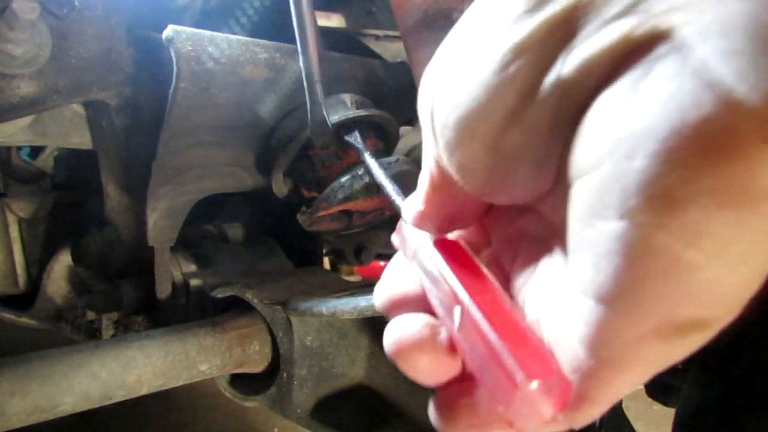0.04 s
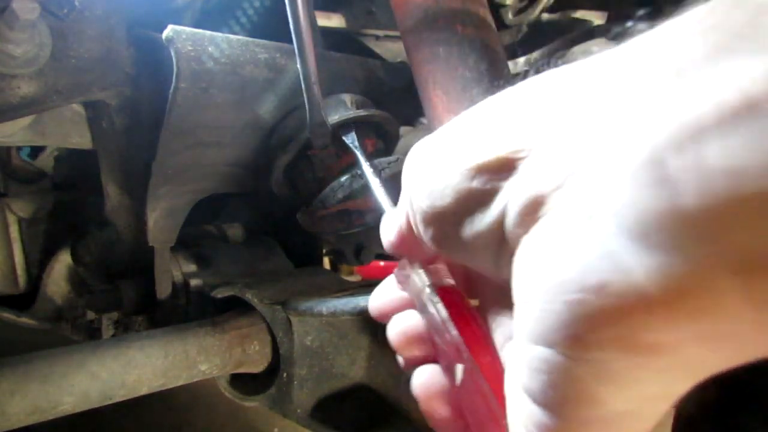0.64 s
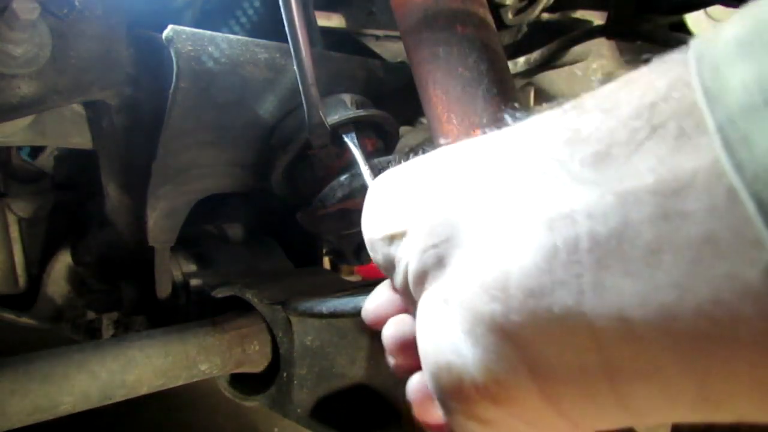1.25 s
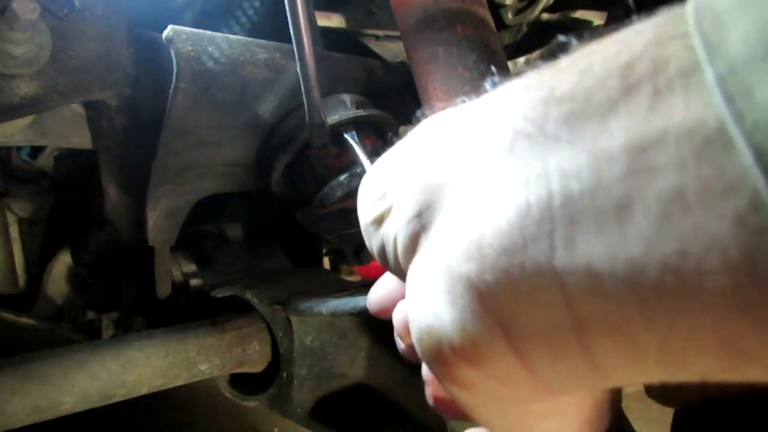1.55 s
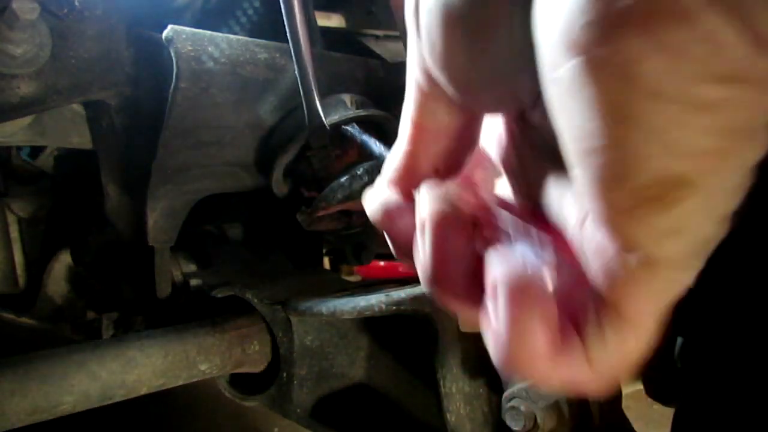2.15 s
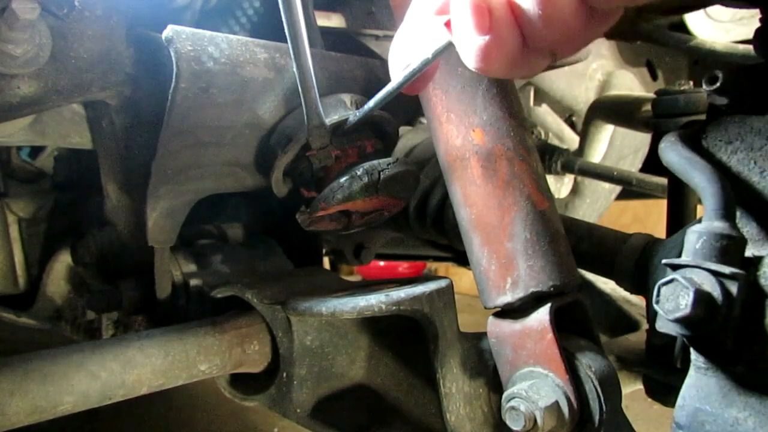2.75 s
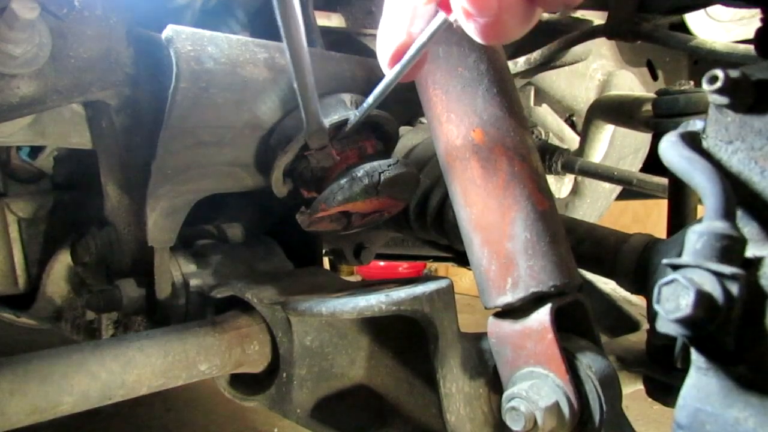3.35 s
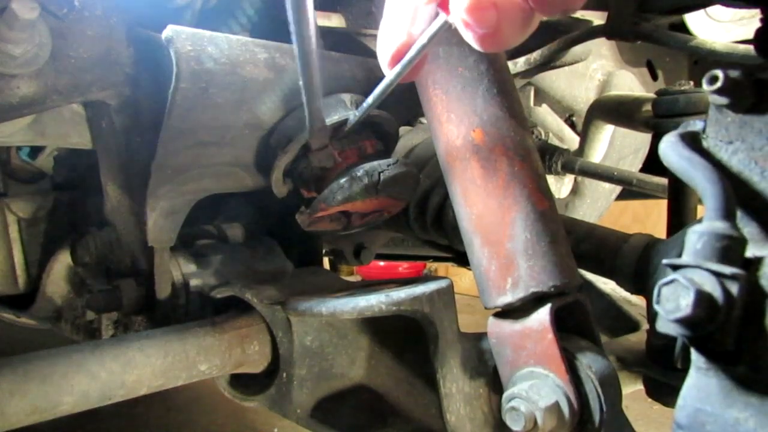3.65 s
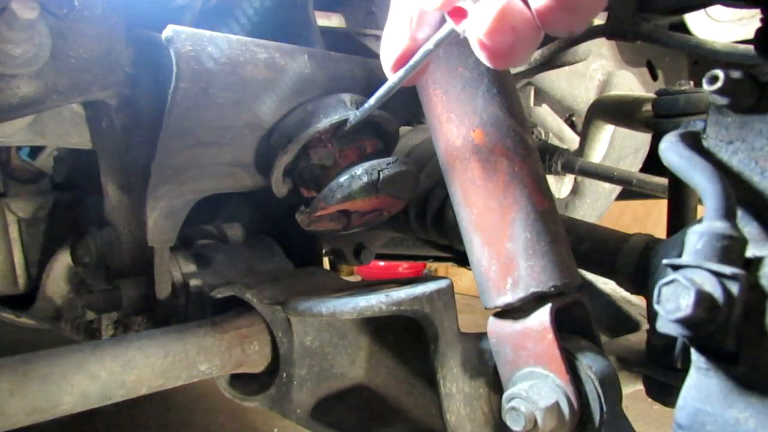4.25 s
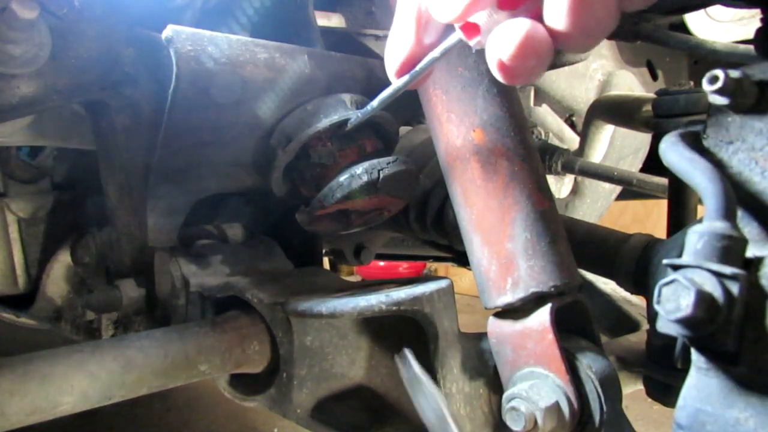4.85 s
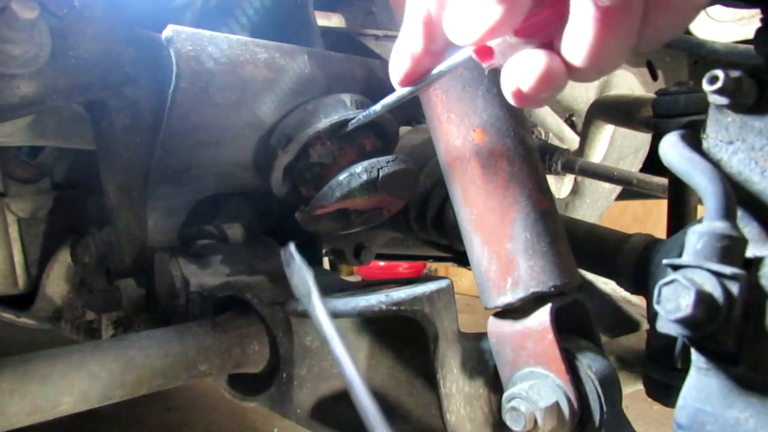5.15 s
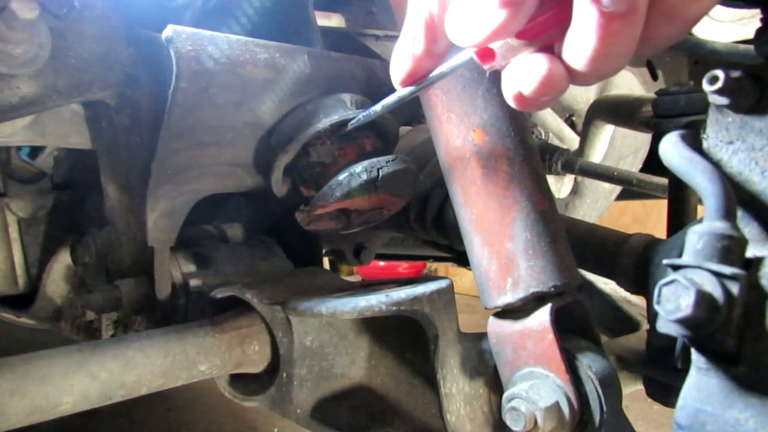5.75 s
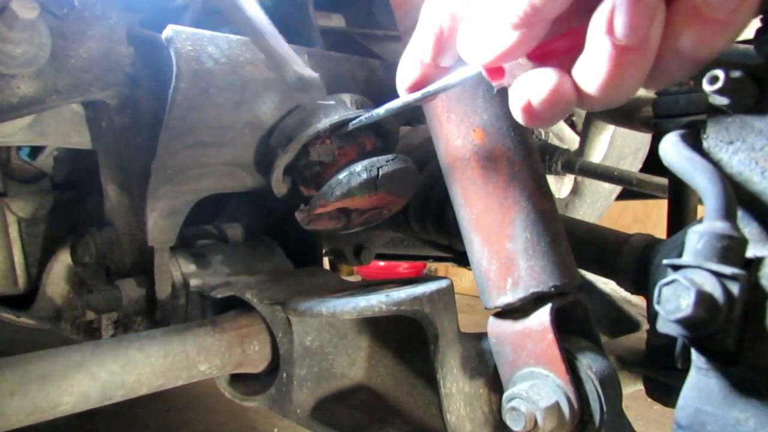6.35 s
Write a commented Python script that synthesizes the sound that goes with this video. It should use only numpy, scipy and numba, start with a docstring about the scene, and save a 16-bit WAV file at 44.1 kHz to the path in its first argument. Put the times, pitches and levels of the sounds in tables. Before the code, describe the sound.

Two screwdrivers pry old rubber out of a car's suspension mount, heard close in a quiet garage. A sharp, briefly ringing metal snap opens, followed by a short skid and a second snap. Soft scraping and rust ticks continue, and a sleeve brushes past with thin handle squeaks. The rubber groans faintly before a loud double snap. Light tip clicks and more rubbing lead to one last metallic clack.

```python
"""Sharp metal snaps and soft rubbing, close by in a quiet garage: two screwdrivers pry a perished
rubber bush (a sleeve of rubber) out of a car's suspension mount. The blades rub through the rubber,
slip, and hit the steel bracket, cup washer and arm, which ring briefly. Rust ticks, the rubber groans
and thuds, a handle squeaks and a shirt sleeve brushes by. An automatic gain control turns the sound
down for a moment after the loudest snaps."""
import sys
import numpy as np
from scipy import signal
from scipy.fft import rfft, irfft
from scipy.io import wavfile
from scipy.ndimage import uniform_filter1d
from numba import njit

SR = 44100
rng = np.random.default_rng(int(sys.argv[2]) if len(sys.argv) > 2 else 0)


def wav_out(sig):
    """Save sig, one row per channel (or a flat mono array), as 16-bit PCM at SR to the path in sys.argv[1]."""
    wavfile.write(sys.argv[1], SR, np.round(np.clip(np.atleast_2d(sig).T, -1, 1) * 32767).astype(np.int16))


N = 290619
TIME = np.arange(N) / SR
AFTER = TIME[:SR // 2]  # seconds since a hit

# A fade time (t60) is how long a sound takes to drop 60 dB. Pan is left level minus right level.
# Hits on each steel part. Each row: start in seconds, level in dB, brightness in dB per octave,
# fade time of the crack in seconds, level of the ringing and its wash in dB, pan in dB.
BRACKET_HITS = [(0.2712, -7, 2.2, 0.032, -5, 0), (0.9328, -11, -0.4, 0.038, 3, 5)]
CUP_HITS = [(4.4471, -6, 1.5, 0.028, -5.5, -6), (4.5418, -14, -1, 0.037, -5, -6.5),
            (5.7041, -33.5, -7, 0.018, -5, -8)]
ARM_HITS = [(5.7425, -42, -7.5, 0.033, 1, 3), (5.7630, -41, -7, 0.013, 6.5, -4),
            (6.2264, -15.5, -0.2, 0.05, -2, -2.5), (6.3680, -37, -5, 0.037, 12.5, -1)]
SHANK_HITS = [(3.7698, -32.5, 0, .014, -1, 0), (3.7812, -34.5, 0, 0.011, -1, 0.0049)]  # one screwdriver's shaft taps the other
# The tones each part rings with. Each row: pitch in Hz, relative level in dB, fade time in seconds.
BRACKET_TONES = [(380, -29, .2), (506, -33, .22), (1450, -12, .08), (1535, -5, .11), (1620, -11, .13),
                 (1712, -14, .17), (1784, -14, .19), (2614, -14, .1), (2905, -11, .14), (3322, -3, .08),
                 (3586, -9, .09), (3725, -10, .07), (4132, 1, .04), (4606, -13, .13), (4800, -10, .1),
                 (6240, -5, .05), (8850, -13, .05)]
CUP_TONES = [(350, -27, .15), (1480, -10, .05), (1590, -13, .1), (2207, -16, .08), (2905, 1, .04),
             (2925, -14, .16), (3650, -16, .1), (4317, -8, .06), (4608, -13, .12), (4915, -3, .065),
             (6331, -18, .06), (11390, -17, .05)]
ARM_TONES = [(1035, -2, 0.059), (1155, 7.5, 0.061), (1440, -3, 0.062), (2090, -6, 0.06), (2760, -15, 0.041),
             (3440, -12, .05)]
SHANK_TONES = [(1280, -2, 0.033), (1425, 2.5, 0.027), (4750, 1, 0.044), (6400, -4, .07)]
SKID_TONES = [(509.4, 4, 0.28), (526, -2, .22), (499, -2.5, 0.36), (1730, 0, 0.29)]  # the bracket after a skid
# A blade skids, catches and skids on. Each row: start in seconds, length in seconds, level in dB.
BLADE_SKIDS = [(0.388, 0.0062, -27), (0.406, 0.021, -22.5)]
# The second blade touches the lower washer. Each row: start in seconds, level in dB.
TIP_TOUCHES = [(5.2926, -36), (5.3273, -24), (5.3686, -34), (5.3918, -28)]
# The clearest rust cracks. Each row: start in seconds, level in dB, brightness in dB per octave,
# fade time in seconds.
RUST_TICKS = [(.659, -37, 7, .008), (.8345, -37, 5, .008), (1.366, -29.5, -3.5, 0.0093),
              (2.314, -29, 1.5, 0.15), (2.380, -30.5, 13, .027), (2.672, -33, -3, 0.0064),
              (2.684, -36.5, 14, .045), (2.7458, -41.5, -3, 0.04), (2.816, -43.5, -8.5, 0.022),
              (2.903, -36.5, -1, 0.011), (2.9087, -35.5, -4.5, 0.017), (2.93, -40, -3, 0.024),
              (2.9574, -35, -3.5, .014), (2.9883, -36.5, -1.5, 0.015), (3.09, -46, -13.5, 0.018),
              (3.1, -41.5, -2, .02), (3.781, -43, -8, .043), (4.1775, -39, 2.5, 0.068)]
# Where the scraping tip is. Each row: time in seconds, pan in dB.
TIP_PAN = [(.66, 2), (1.37, -3), (2.5, 0), (3.8, 0), (5.3, -5), (6.3, 0)]
# Rubbing strokes. Each row: start in seconds, length in seconds, relative level in dB,
# swell in dB per second, fine grit in dB, low drag in dB, pan in dB.
RUBBER_STROKES = [(-.06, 0.24, -55, -45, 1, -9, -2.5), (.48, .2, -54.5, -18, 0, -3, -3),
                  (.665, 0.21, -50, 48, -3.5, -12.5, -4.5), (.95, 0.15, -51, -38, -3.5, -6, -3),
                  (1.115, 0.14, -41.5, -17, -6.5, -13, -4.5), (2.53, 0.3, -56.5, -39, 0, -8.5, -4),
                  (2.96, 0.13, -60, 4, 0.5, 2.5, 0.5), (3.12, .27, -52.5, -6, 3.5, -5.5, 1),
                  (3.41, 0.18, -58, -8, -2.5, -12, 2), (3.73, 0.18, -54, 6, -2.5, -6.5, 1),
                  (3.95, 0.26, -64.5, 33, -3, 3, -3), (4.85, 0.31, -54.5, -5, -3.5, -1, -4),
                  (5.055, 0.051, -65.5, -5, 16.5, -23, -2), (5.305, 0.053, -55.5, 22, 9.5, -3, -6),
                  (5.38, 0.12, -52, 8, -2.5, 3.5, -4.5), (5.53, 0.18, -56, -12, -4, 1.5, -3.5),
                  (6.23, 0.09, -52, 0, -6, -3, 0), (6.32, 0.11, -50, -35, 1, -2, 1.5),
                  (6.48, .13, -51.5, 12, -4, -5, 1.5)]  # a blade in the rubber
RIM_STROKES = [(4.18, .26, -58, 28, -8, -2, -1.5), (4.54, 0.11, -52, 2, -17, -6.5, -3),
               (4.66, 0.16, -60, -19, -26, -1, -4), (4.96, 0.25, -58.5, -8, -5, -5, -8)]  # a blade on the cup washer's rim
SLEEVE_STROKES = [(1.89, 0.487, -51.5, 6.6, 0.66, -4.5, -1.9), (2.205, 0.081, -45.5, 5.5, 7, -24, -.5)]  # cloth brushing by
# Bumps as the rubber gives. Each row: start in seconds, level in dB, upper edge of the sound in Hz,
# fade time in seconds, pan in dB.
RUBBER_THUDS = [(1.2561, -40, 1140, 0.094, -2), (2.7800, -52, 130, .13, -1), (3.601, -57, 400, 0.2, 5),
                (4.4473, -26.5, 440, 0.021, -16), (6.354, -36.5, 805, 0.064, 0)]
# The handle turns in the palm. Each row: start in seconds, length in seconds, pitch in Hz, level in dB.
HANDLE_SQUEAKS = [(1.924, 0.19, 3930, -56.5), (2.09, .12, 2630, -51.5), (2.233, 0.052, 3870, -43)]

# Colours: how strong each noise is from bass to treble. Each row: frequency in Hz, relative level in dB.
BRACKET_CRACK_COLOUR = [(200, -38), (950, -31), (1540, -10), (2300, -22), (3300, -1), (4150, 0),
                        (5400, -16), (6300, -7), (7600, -17), (9000, -12), (12000, -21), (16000, -28)]
BRACKET_WASH_COLOUR = [(150, -26), (420, -9), (950, -17.5), (1600, 5), (2250, -11.5), (3000, 0), (4800, -5),
                       (5400, -13.5), (9000, -20), (16000, -36)]
CUP_CRACK_COLOUR = [(200, -40.5), (700, -34.5), (1500, -3), (2450, -11), (2920, 6.5), (3500, -1.5),
                    (4700, 2.5), (5800, -11.5), (8500, -13), (12000, -25.5), (16000, -22)]
CUP_WASH_COLOUR = [(150, -48), (340, 0), (600, -16), (1100, -14), (1550, -1), (2500, -5), (3000, -9),
                   (3700, -4), (4900, 4), (5800, -8), (9000, -15), (16000, -38)]
ARM_CRACK_COLOUR = [(100, -36), (500, -20.5), (950, -6.5), (1600, -8.5), (2100, -2), (3100, -2),
                    (5000, -6.5), (9000, -12.5), (16000, -23)]
ARM_WASH_COLOUR = [(100, -14), (500, -4.5), (1100, 1.5), (3000, -2), (6000, -10), (16000, -23)]
CLICK_COLOUR = [(300, -59), (2000, -20), (4000, 7.5), (9000, 5), (12500, 2), (16000, -27)]  # a hardened tip
CHATTER_COLOUR = [(200, -33), (1000, -27), (1550, -9), (2100, -13), (3000, -1), (3700, 1), (4400, -2),
                  (5300, -18), (6400, -5), (7500, -18), (9000, -16), (16000, -28)]
LIGHT_TOUCH_COLOUR = [(1000, -11), (4500, -19), (6000, -5), (7800, 8), (10000, -3), (16000, -10)]
TICK_COLOUR = [(200, -32), (1400, -4), (4500, 4.5), (9000, 1), (16000, -7)]
RUBBER_COLOUR = [(700, -26), (1500, -7), (2200, 0), (3200, 0.5), (4700, -0.5), (6500, -5.5), (9000, -21),
                 (16000, -66)]
WASHER_RIM_COLOUR = [(700, -20), (1250, -10), (1520, 5), (1850, 0), (2600, 1), (2900, 1), (3300, -4),
                     (4200, 0.5), (4900, 1), (5800, -5), (9000, -20), (16000, -35)]
SLEEVE_COLOUR = [(700, -25), (1400, -1.5), (2500, 1), (4000, 3.5), (6500, -2.5), (9000, -9), (16000, -33)]
FINE_GRIT_COLOUR = [(3500, -12.5), (7000, 1.5), (9000, -1.5), (13000, -4), (16000, -7)]
LOW_DRAG_COLOUR = [(120, -22), (220, -6.5), (410, -3), (510, -1.5), (640, -1.5), (830, 1), (1100, -4),
                   (1380, 0), (1530, -5), (1700, -3), (3000, -37)]
GROAN_COLOUR = [(100, -33), (180, -12), (212, 0), (265, -5.5), (340, -2), (440, -9.5), (800, -14.5),
                (2000, -45)]
AIR_COLOUR = [(15, -61), (25, -2.5), (114, -6.5), (256, -10), (317, -8.5), (394, -7), (439, -10), (476, -7),
              (607, -9.5), (1130, -8.5), (1700, -11), (2690, -12), (3620, -12.5), (10100, -17.5),
              (16000, -23)]


def snaps(hits, tones, crack_colour, wash_colour, tones_db, wash_db, wash_t60, tip_db, tip_t60=0.0019):
    """A blade hits steel: a click, a crack, ringing, then a wash of noise from the wheel well's panels."""
    out = np.zeros((2, N))
    for start, db, tilt_db, t60, ring_db, pan_db in hits:
        tip = colour(burst(tip_t60, alike=0.41), CLICK_COLOUR, tilt_db)
        crack = colour(burst(t60, alike=0.42), crack_colour, tilt_db)
        wash = colour(burst(wash_t60, alike=0.26), wash_colour, tilt_db / 2)
        ringing = undb(ring_db + tones_db) * steel_ring(tones)
        direct = place(undb(tip_db) * tip + crack + ringing, pan_db)
        add(out, start, undb(db) * (direct + undb(ring_db + wash_db) * wash))
    return out


def steel_ring(tones, spread=1.0, rise_s=0.00037):
    """Struck steel vibrates in fading tones, each a little out of step between left and right."""
    out = 0
    for hz, db, t60 in tones:
        phase = rng.uniform(0, 2 * np.pi) + spread * np.array([[0], [rng.standard_normal()]])
        detuned = hz * (1 + 0.0029 * rng.standard_normal())  # the blade's pressure shifts the pitch
        out = out + undb(db) * fade(t60) * np.sin(2 * np.pi * detuned * AFTER + phase)
    return out * (1 - np.exp(-AFTER / rise_s))


def skid(slip_hz=600, attack_s=0.0084, release_s=0.017, wash_db=-11, ring_db=-40):
    """A blade sticks and slips unevenly across the bracket, chattering and leaving it humming."""
    gap_chance, size_chance = rng.standard_normal((400, 2)).T
    times = BLADE_SKIDS[0][0] + np.cumsum(np.exp(0.5 * gap_chance)) / slip_hz
    force = sum(undb(db) * contact(times - start, length, attack_s, release_s)
                for start, length, db in BLADE_SKIDS)
    slips = np.zeros(N)
    slips[(times * SR).astype(int) % N] = force * undb(2 * size_chance) * np.sqrt(SR / slip_hz)
    crack = colour(burst(0.022, alike=0.34), CHATTER_COLOUR)
    wash = colour(burst(0.2, alike=0.57), BRACKET_WASH_COLOUR)
    one_slip = np.sqrt(2) * (crack / np.linalg.norm(crack) + undb(wash_db) * wash / np.linalg.norm(wash))
    out = signal.fftconvolve(slips[None], one_slip, axes=1)[:, :N]
    add(out, BLADE_SKIDS[-1][0], undb(ring_db) * steel_ring(SKID_TONES, spread=0.59, rise_s=0.018))
    return out


def tip_touches(t60=0.0085, pan_db=-5.5):
    """A light touch rings only the very tip of a blade, thin and bright."""
    out = np.zeros((2, N))
    for start, db in TIP_TOUCHES:
        click = colour(burst(t60, alike=0.26), LIGHT_TOUCH_COLOUR)
        add(out, start, undb(db) * place(click, pan_db))
    return out


def rust_ticks(flake_count=14, flake_db=-45, flake_tilt_db=1.5, flake_t60=0.009, tail_db=-24):
    """Brittle rust breaks in tiny cracks: clear ones, plus faint flakes at random during the rubbing."""
    out, flakes = np.zeros((2, N)), []
    for _ in range(flake_count):
        start, length = RUBBER_STROKES[rng.integers(len(RUBBER_STROKES))][:2]
        moment = start + length * rng.random()
        flakes.append((moment, flake_db + 4 * rng.standard_normal(), flake_tilt_db, flake_t60))
    for start, db, tilt_db, t60 in RUST_TICKS + flakes:
        pan_db = np.interp(start, *np.transpose(TIP_PAN))
        crack = noise(len(AFTER), alike=0.42) * (fade(t60) + undb(tail_db) * fade(t60=0.38))
        add(out, start, undb(db) * sides(pan_db) * colour(crack, TICK_COLOUR, tilt_db))
    return out


def rubbing(strokes, body_colour, scatter_db, gain_db, attack_s, release_s):
    """Tiny slips make a rasp with grit above and drag below; each stroke swells or eases steadily."""
    body = colour(tiny_slips(700, scatter_db, alike=0.17), body_colour)
    grit = colour(tiny_slips(1500, scatter_db, alike=0.016), FINE_GRIT_COLOUR)
    drag = colour(tiny_slips(150, scatter_db, alike=0.059), LOW_DRAG_COLOUR)
    out = np.zeros((2, N))
    for start, length, db, swell_db_per_s, grit_db, drag_db, pan_db in strokes:
        span = (TIME > start) & (TIME < start + length + release_s)
        t = TIME[span] - start
        level_db = db + gain_db + swell_db_per_s * (t - length / 2)
        pressure = contact(t, length, attack_s, release_s) * undb(level_db)
        rasp = body[:, span] + undb(grit_db) * grit[:, span] + undb(drag_db) * drag[:, span]
        out[:, span] += pressure * sides(pan_db) * rasp
    return out


def thuds():
    """The rubber lets go and the lever bumps softly against the mount."""
    out = np.zeros((2, N))
    for start, db, edge_hz, t60, pan_db in RUBBER_THUDS:
        dull_colour = [(30, -2), (edge_hz / 3, 0), (edge_hz, -4), (edge_hz * 6, -45)]
        bump = colour(burst(t60, alike=0.49), dull_colour)
        add(out, start, undb(db) * sides(pan_db) * bump)
    return out


def handle_squeaks(width_hz=570, attack_s=0.033, release_s=0.039):
    """Tiny slips of the handle in the palm gather around one pitch and make a thin squeak."""
    out, slips = 0, tiny_slips(300, scatter_db=1.2, alike=0.39)
    for start, length, hz, db in HANDLE_SQUEAKS:
        b, a = signal.iirpeak(hz, hz / width_hz, fs=SR)
        tone = signal.lfilter(b, a, signal.lfilter(b, a, slips))  # filtering twice narrows it further
        out = out + undb(db) * tone / np.std(tone) * contact(TIME - start, length, attack_s, release_s)
    return out


def rubber_groan(start_s=3.74, gives_s=4.46, peak_db=-52.5, build_db_per_s=12.5, relax_db_per_s=36):
    """Stretched rubber creeps in slow, dull slips, louder as the load builds and fading once it gives."""
    since = TIME - gives_s
    load_db = peak_db + np.minimum(build_db_per_s * since, -relax_db_per_s * since)
    grip = np.clip((TIME - start_s) / 0.066, 0, 1)
    creep = colour(tiny_slips(90, scatter_db=1.5, alike=0.41), GROAN_COLOUR)
    return grip * undb(load_db) * creep * sides(pan_db=-3.9)


def garage(air_db=-52.5, hum_hz=115, hum_db=-76):
    """Still air and a faint mains hum, both wavering slightly in level."""
    air = colour(noise(N, alike=0.019), AIR_COLOUR) * undb(air_db + 0.5 * wander(4.2))
    hum = undb(hum_db + 2 * wander(3.22)) * np.sin(2 * np.pi * hum_hz * TIME)
    return (air + hum) * sides(pan_db=-1.35)


def undb(db):
    """Turn decibels into a number to multiply by."""
    return 10 ** (np.asarray(db) / 20)


def fade(t60):
    """A curve that drops 60 dB every t60 seconds."""
    return np.exp(-np.log(1000) * AFTER / t60)


def contact(t, length, attack_s, release_s):
    """Rise smoothly, hold until the length is over, then let go smoothly."""
    rise = np.clip(t / attack_s, 0, 1)
    fall = np.clip(1 - (t - length) / release_s, 0, 1)
    return np.sin(np.pi / 2 * rise) ** 2 * np.sin(np.pi / 2 * fall) ** 2


def noise(count, alike):
    """Stereo hiss; alike is the share (0 to 1) that left and right have in common."""
    return np.sqrt(alike) * rng.standard_normal(count) + np.sqrt(1 - alike) * rng.standard_normal((2, count))


def burst(t60, alike):
    """Hiss that starts suddenly and dies away."""
    return noise(len(AFTER), alike) * fade(t60)


def wander(rate_hz):
    """A curve that glides to a new random value rate_hz times a second."""
    hold = int(SR / rate_hz)
    steps = np.repeat(rng.standard_normal(N // hold + 1), hold)
    return 1.8 * uniform_filter1d(steps, hold)[:N]


def tiny_slips(rate_hz, scatter_db, alike):
    """Friction is many slips of unequal size: hiss whose level flickers."""
    slips = noise(N, alike) * undb(scatter_db * wander(rate_hz) + 0.59 * wander(35))
    return slips / np.std(slips)


def colour(sound, points, tilt_db=0, size=2048):
    """Filter a sound to a colour, brighter by tilt_db per octave; plain hiss keeps its power."""
    hz, db = np.transpose(points)
    octave = np.log2(np.maximum(np.fft.rfftfreq(size, 1 / SR), 1))
    tilt = tilt_db * np.clip(octave, np.log2(hz[0]), np.log2(hz[-1]))
    gain = undb(np.interp(octave, np.log2(hz), db) + tilt)
    cepstrum = irfft(np.log(gain / np.sqrt(np.mean(gain ** 2))))
    # folding the second half onto the first keeps the filter from sounding before a hit
    cepstrum[1:size // 2] *= 2
    cepstrum[size // 2 + 1:] = 0
    response = irfft(np.exp(rfft(cepstrum)))
    return signal.fftconvolve(sound, response[None], axes=1)[:, :sound.shape[1]]


def sides(pan_db):
    """Left and right gains for a pan."""
    return undb(np.array([pan_db, -pan_db]) / 2).reshape(2, -1)


def place(sound, pan_db):
    """A sound from one side reaches the other side weaker, and 30 microseconds later for each dB."""
    lags = np.maximum([-pan_db, pan_db], 0) * 3e-5
    delayed = [np.interp(AFTER - lag, AFTER, channel, left=0) for lag, channel in zip(lags, sound)]
    return sides(pan_db) * np.array(delayed)


def add(track, start_s, sound):
    """Mix a sound into a track at a given time."""
    start = min(max(int(start_s * SR), 0), N)
    track[:, start:start + sound.shape[1]] += sound[:, :N - start]


@njit
def follow(size, attack, release):
    """Track a sound's level, rising at the attack rate and falling at the release rate."""
    out, level = np.empty(len(size)), 0.
    for i in range(len(size)):
        level += (size[i] - level) * (attack if size[i] > level else release)
        out[i] = level
    return out


def scene():
    """Snaps, scraping and rubbing over the quiet of the garage."""
    steel = snaps(BRACKET_HITS, BRACKET_TONES, BRACKET_CRACK_COLOUR, BRACKET_WASH_COLOUR,
                  tones_db=-8, wash_db=-15, wash_t60=0.25, tip_db=-15)
    steel += snaps(CUP_HITS, CUP_TONES, CUP_CRACK_COLOUR, CUP_WASH_COLOUR,
                   tones_db=-3.5, wash_db=-16.5, wash_t60=0.24, tip_db=-3)
    steel += snaps(ARM_HITS, ARM_TONES, ARM_CRACK_COLOUR, ARM_WASH_COLOUR,
                   tones_db=-18.5, wash_db=-15, wash_t60=0.24, tip_db=-9)
    steel += snaps(SHANK_HITS, SHANK_TONES, TICK_COLOUR, CLICK_COLOUR,
                   tones_db=-4.5, wash_db=-11.5, wash_t60=0.27, tip_db=-11)
    rubs = rubbing(RUBBER_STROKES, RUBBER_COLOUR, scatter_db=0.87, gain_db=0.5,
                   attack_s=0.067, release_s=0.1)
    rubs += rubbing(RIM_STROKES, WASHER_RIM_COLOUR, scatter_db=0.5, gain_db=4,
                    attack_s=0.056, release_s=0.07)
    sleeve = rubbing(SLEEVE_STROKES, SLEEVE_COLOUR, scatter_db=1.5, gain_db=1.5,
                     attack_s=0.051, release_s=0.092)
    prying = steel + skid() + rust_ticks() + tip_touches() + thuds() + rubs
    return prying + sleeve + handle_squeaks() + rubber_groan() + garage()


def record(dry, threshold_db=-32.0, slope=0.31, attack_s=0.0072, release_s=0.17, top_hz=16000):
    """Gain control dips after loud snaps; peaks past full scale clip, and the highest treble is cut."""
    level = follow(np.abs(dry).max(axis=0), 1 / (attack_s * SR), 1 / (release_s * SR))
    gain = np.maximum(level / undb(threshold_db), 1) ** -slope
    treble_cut = signal.ellip(10, 0.2, 90, top_hz, fs=SR, output="sos")
    return signal.sosfilt(treble_cut, np.clip(dry * gain, -1, 1))


dry = scene()
out = record(dry)
wav_out(out)
```